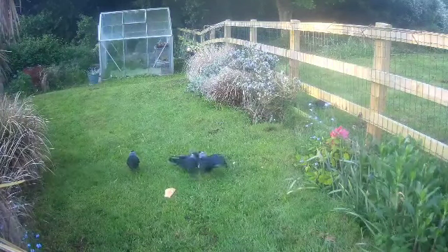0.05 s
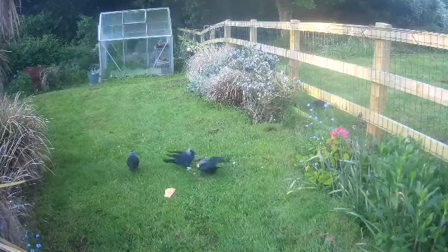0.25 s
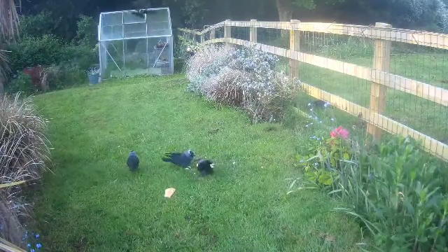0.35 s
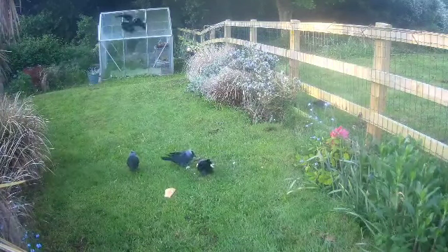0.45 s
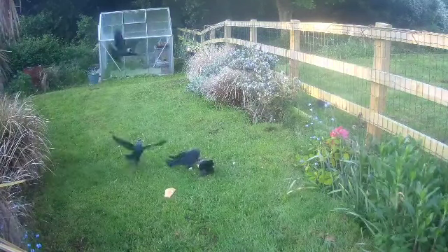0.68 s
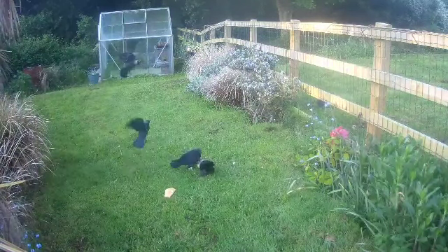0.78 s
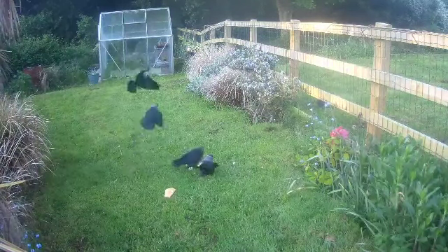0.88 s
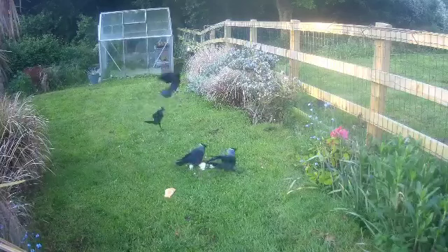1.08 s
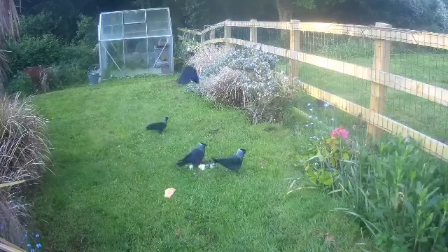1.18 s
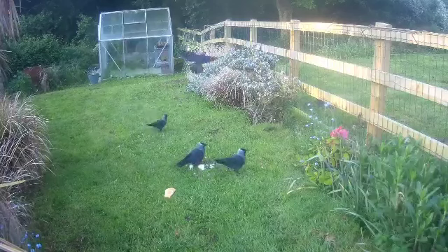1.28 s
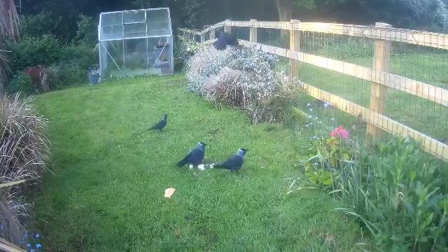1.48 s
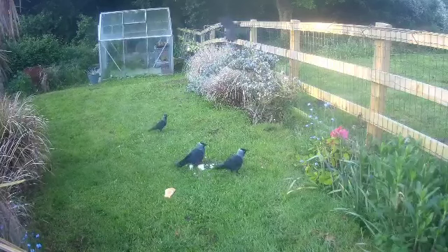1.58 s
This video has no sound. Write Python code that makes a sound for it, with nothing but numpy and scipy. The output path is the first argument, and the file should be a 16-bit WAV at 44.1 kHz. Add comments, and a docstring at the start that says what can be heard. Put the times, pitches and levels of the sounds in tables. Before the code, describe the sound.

Jackdaws give four short, harsh calls over a faint outdoor hiss and low rumble.

```python
"""Jackdaws squabble over food on a lawn: two sharp calls, then two softer, lower ones.
Voice-box pulses ring the throat; the sharp calls fall in pitch and break into a rasp.
Wingbeats push soft puffs of air, and the garden throws back short echoes.
A songbird whistles far away over faint hiss and a low outdoor rumble."""
import sys
import numpy as np
from scipy import signal
from scipy.fft import rfft, irfft
from scipy.io import wavfile
from scipy.ndimage import uniform_filter1d

SR = 44100
rng = np.random.default_rng(int(sys.argv[2]) if len(sys.argv) > 2 else 0)


def to_wav(s):
    """Save 16-bit WAV."""
    ch = np.atleast_2d(s).T  # columns
    pcm = np.round(np.clip(ch, -1, 1) * 32767)  # PCM
    wavfile.write(sys.argv[1], SR, pcm.astype(np.int16))


N = 72765
BAND_LIMIT_HZ = 15550

# Outdoor noise spectrum: freq_hz, gain_db
AIR_SPECTRUM = [(12, -27), (22, 1.5), (34, -1), (50, -3.5), (75, -5.5), (110, -7), (200, -9), (300, -11.5),
                (400, -14.5), (550, -17), (1250, -21.5), (1900, -22), (3300, -23), (8600, -23),
                (12000, -28.5), (15400, -31)]
# Songbird notes: start_s, length_s, from_hz, to_hz, blur_hz, level_db
WHISTLE_NOTES = [(0, .11, 2630, 2630, 16, -76), (.70, .29, 2334, 2540, 120, -73),
                 (.73, 0.24, 2134, 2130, 86, -75.5), (0.931, 0.328, 3350, 3200, 23, -81.5),
                 (1.483, 0.15, 3480, 3450, 30, -79)]
# Call contours: time_s, pitch_hz, level_db, roughness (0-1), treble_db, fundamental_db
SHARP_CONTOUR = [(.2185, 1100, -45, 0.09, -19, 4.5), (.231, 1052, -32.5, 0, -1, -5.5),
                 (.241, 1005, -36, 0, 10.5, -4), (.251, 919.4, -36.5, 0.11, -14, -0.5),
                 (.258, 804, -38.5, .2, -22, 10), (.265, 644, -52, 0.31, -12, -15)]
HARSH_CONTOUR = [(.3655, 1116, -37, 0.016, -49, -24), (.374, 1070, -27.5, 0.015, -24, -13.5),
                 (.379, 985.5, -37, 0.022, 7, -2.5), (.389, 922, -34.5, 0.094, 3, 1.5),
                 (.394, 932.6, -41.5, 0.39, 14, -6), (.401, 982.5, -35, 0.21, -3, -0.5),
                 (.412, 849, -35, 0.35, 6.5, -2), (.422, 764.5, -40.5, 0.27, 1, -5.5),
                 (.430, 629, -40, 0.52, -3, -4), (.440, 569, -47, 0.31, -12, 7.5),
                 (.445, 527, -40.5, 0.61, -1, 9)]
SOFT_CONTOUR = [(.581, 972, -47, .03, -15, 6.5), (.592, 944, -41, 0.019, -17, -2),
                (.603, 865, -43, 0.099, 2.5, 4.5), (.613, 760, -39.5, 0.17, 4.5, 1.5),
                (.620, 777, -46.5, 0.29, -19, -12), (.627, 730, -44.5, 0.24, -17, -7),
                (.632, 625, -34.5, 0.15, -3, 7)]
NASAL_CONTOUR = [(.650, 597, -51, 0.1, -25, -2), (.657, 643, -43.5, 0.064, -10, -1.7),
                 (.671, 669.3, -45.5, .04, 10, 0.55), (.682, 643, -50, .04, 7, -0.97),
                 (.690, 610, -50, .06, -10, 0.78), (.694, 570, -52, 0.1, -4, 0.69)]
# Throat response, beak wide open: freq_hz, gain_db
SHARP_FORMANTS = [(300, -50), (600, -24.5), (900, -16.5), (1080, -10.5), (1300, -6), (1600, -5.5),
                  (1850, 5.5), (2130, 3), (2550, -17), (3030, -5.5), (3250, -14), (3550, -7.5), (4100, -13),
                  (4600, -25.5), (5250, -9.5), (6900, -37.5), (8100, -23.5), (9300, -40), (15000, -55)]
HARSH_FORMANTS = [(300, -32.5), (560, -18.5), (720, -2), (900, -5.5), (1270, -4), (1480, -13.5),
                  (1850, 1.5), (2130, 0.5), (2600, -11.5), (3000, -8.5), (3280, -12), (3600, -19.5),
                  (3950, -14), (4600, -28.5), (5300, -13), (6150, -19), (7300, -30), (8100, -14.5),
                  (8650, -20), (9400, -24.5), (10300, -20.5), (11300, -26), (13500, -47)]
# Throat response, beak nearly shut: freq_hz, gain_db
SOFT_FORMANTS = [(300, -14), (620, -5), (900, -0.5), (1250, -15), (1550, -1), (1900, 1.5), (2330, 2),
                 (2600, -2), (2850, -10.5), (3200, -19), (3800, -13), (4400, -22.5), (7200, -27),
                 (8100, -17.5), (9500, -27), (15000, -51)]
NASAL_FORMANTS = [(300, -21), (620, 0), (950, -6), (1320, -3), (1630, 5), (1950, -3.5), (2620, -14),
                  (3350, -10.5), (4200, -23.5), (7200, -26.5), (8050, -27), (9000, -39), (15000, -44)]
# Reflections off the ground and nearby things: delay_s, gain_db
EARLY_ECHOES = [(.0042, -19.5), (.0077, -17), (.0195, -26)]
# Scatter from shrubs: freq_hz, gain_db
SHRUB_SPECTRUM = [(300, -11.5), (1000, -12), (2000, -14.5), (4000, -6), (8000, -5.5), (14000, -28)]
# Wingbeats of the scuffle: peak_s, level_db
WING_BEATS = [(0.259, -55.5), (.316, -63.5), (0.419, -56), (.465, -58), (.510, -69), (0.639, -55.5),
              (0.667, -60), (0.726, -61.5)]
# Air puff of a wing: freq_hz, gain_db
WING_SPECTRUM = [(40, -7), (110, 1), (190, -4.5), (400, -5.5), (800, -5), (3000, -26), (15000, -28)]
# Far reflection: freq_hz, gain_db
FAR_ECHO_SPECTRUM = [(700, -31.5), (1100, -11.5), (2000, -18), (3100, -10.5), (5300, -17), (8000, -26),
                     (14000, -32)]


def amp(db):
    """Decibels to gain."""
    return 10 ** (np.asarray(db) / 20)


def unit_rms(x):
    """Scale to rms 1."""
    return x / np.sqrt(np.mean(x ** 2) + 1e-20)


def add(mix, start_s, sound):
    """Mix a sound in at start_s."""
    part = mix[max(round(start_s * SR), 0):][:len(sound)]
    part += sound[:len(part)]


def wander(n, rate_hz):
    """Smooth random curve, rms 1, rolling off at rate_hz."""
    freq_hz = np.fft.rfftfreq(N, 1 / SR)
    spectrum = rfft(rng.standard_normal(N)) * np.exp(-(freq_hz / rate_hz) ** 2)
    return unit_rms(irfft(spectrum, N))[:n]


def colour(x, spectrum, size=4096):
    """Minimum-phase filter through (freq_hz, gain_db) points."""
    freq_hz, gain_db = np.transpose(spectrum)
    bin_hz = abs(np.fft.fftfreq(size, 1 / SR))
    log_gain = np.log(amp(np.interp(np.log(bin_hz + 1), np.log(freq_hz), gain_db)))
    taps = np.fft.ifft(np.exp(np.conj(signal.hilbert(log_gain)))).real[:size // 2]
    return signal.fftconvolve(x, taps)[:len(x)]


def lowpass(x, cutoff_hz):
    """Zero-phase low-pass."""
    return signal.sosfiltfilt(signal.butter(2, cutoff_hz, fs=SR, output="sos"), x)


def outdoor_air(level_db=-61, swell_db=1.8):
    """Steady hiss over a gently swelling rumble."""
    noise = unit_rms(colour(rng.standard_normal(N + SR), AIR_SPECTRUM)[SR:])
    rumble = lowpass(noise, cutoff_hz=406)
    hiss = noise - rumble
    swell = amp(-swell_db * wander(N, rate_hz=30))
    return amp(level_db) * (hiss + rumble * swell)


def songbird():
    """Faint gliding whistles, blurred by distance."""
    out = np.zeros(N)
    for start_s, length_s, from_hz, to_hz, blur_hz, level_db in WHISTLE_NOTES:
        n = round(length_s * SR)
        glide = np.exp(2j * np.pi * np.cumsum(np.linspace(from_hz, to_hz, n)) / SR)
        blur = wander(n, blur_hz) + 1j * wander(n, blur_hz)
        whistle = (glide * blur).real * signal.windows.tukey(n, .5)
        add(out, start_s, amp(level_db) * unit_rms(whistle))
    return out


def voice_box(pitch_hz, roughness, flutter_hz=450, smear_rad=0.219, puff_cycles=0.35):
    """Pulse train; with roughness it grows unsteady and breathy and drops an octave."""
    n = len(pitch_hz)
    jitter = np.exp(0.0854 * roughness * wander(n, flutter_hz))
    cycles = np.cumsum(pitch_hz * jitter) / SR
    k = np.arange(1, 31)[:, None]
    # Higher overtones lag more, spreading each pulse over its cycle.
    harmonics = np.cos(2 * np.pi * k * cycles - smear_rad * k ** 2)
    subharmonics = np.cos(2 * np.pi * (k - .5) * cycles - smear_rad * (k - .5) ** 2)
    doubling = np.clip((roughness - 0.21) / 0.089, 0, 1)  # at 1, every other pulse is gone
    band_gain = (k * pitch_hz < BAND_LIMIT_HZ) * np.sqrt(pitch_hz / BAND_LIMIT_HZ)
    puffs = unit_rms(np.exp(-(cycles % 1) / puff_cycles) * rng.standard_normal(N)[:n])
    shimmer = np.exp(.35 * roughness * wander(n, flutter_hz))
    pulses = ((harmonics + doubling * subharmonics) * band_gain).sum(axis=0) * shimmer
    fundamental = harmonics[0] * band_gain[0] * shimmer
    return fundamental, pulses - fundamental + .45 * roughness * puffs


def jackdaw(contour, formants, attack_s=0.0019, release_s=0.0015):
    """One call: voice-box pulses ring the throat."""
    time_s, *columns = np.transpose(contour)
    t = np.arange(time_s[0], time_s[-1], 1 / SR)
    pitch_hz, level_db, roughness, treble_db, fundamental_db = (np.interp(t, time_s, c) for c in columns)
    fundamental, buzz = voice_box(pitch_hz, roughness)
    voice = colour(amp(fundamental_db) * fundamental + buzz, formants)
    body = lowpass(voice, cutoff_hz=3820)
    voice = body + amp(treble_db) * (voice - body)
    power = uniform_filter1d(uniform_filter1d(voice ** 2, size=200), size=200)
    gate = np.clip(np.minimum((t - t[0]) / attack_s, (t[-1] - t) / release_s), 0, 1)
    out = np.zeros(N)
    add(out, t[0], voice / np.sqrt(power + 1e-12) * amp(level_db) * gate)
    return out


def garden(sound, rise_s=0.0067, shrub_t60_s=0.24, tree_t60_s=1.0, tree_db=-28):
    """Early echoes, short scatter from shrubs, faint tail from far trees."""
    t = np.arange(SR) / SR
    scatter = rng.standard_normal((2, SR)) * (1 - np.exp(-t / rise_s))
    shrubs = scatter[0] * amp(-60 * t / shrub_t60_s)
    trees = scatter[1] * amp(-60 * t / tree_t60_s)
    response = colour(shrubs / np.linalg.norm(shrubs), SHRUB_SPECTRUM)
    response += amp(tree_db) * trees / np.linalg.norm(trees)
    for delay_s, gain_db in EARLY_ECHOES:
        add(response, delay_s, amp([gain_db]))
    return signal.fftconvolve(sound, response)[:N]


def wings(half_width_s=0.015):
    """Each wingbeat pushes a soft, low puff of air."""
    t = np.arange(N) / SR
    push = sum(amp(db) * np.exp(-((t - peak_s) / half_width_s) ** 2) for peak_s, db in WING_BEATS)
    return push * unit_rms(colour(rng.standard_normal(N), WING_SPECTRUM))


def far_echo(calls, delay_s=.0472, send_db=(0, -3, -5, -11)):
    """One clear reflection; each call reaches it more weakly as the birds turn."""
    out = np.zeros(N)
    add(out, delay_s, colour(amp(send_db) @ calls, FAR_ECHO_SPECTRUM))
    return out


def scene():
    """Four calls with echoes, wingbeats and background; mono."""
    calls = np.array([
        jackdaw(SHARP_CONTOUR, SHARP_FORMANTS),
        jackdaw(HARSH_CONTOUR, HARSH_FORMANTS),
        jackdaw(SOFT_CONTOUR, SOFT_FORMANTS),
        jackdaw(NASAL_CONTOUR, NASAL_FORMANTS),
    ])
    direct = calls.sum(axis=0)
    mix = direct + garden(direct) + wings() + far_echo(calls) + songbird() + outdoor_air()
    return mix[None]


def record(dry):
    """Steep low-pass at the band limit."""
    taps = signal.firwin(511, BAND_LIMIT_HZ, window=("kaiser", 9), fs=SR)
    return signal.oaconvolve(dry, taps[None], "same")


dry = scene()
out = record(dry)
to_wav(out)
```